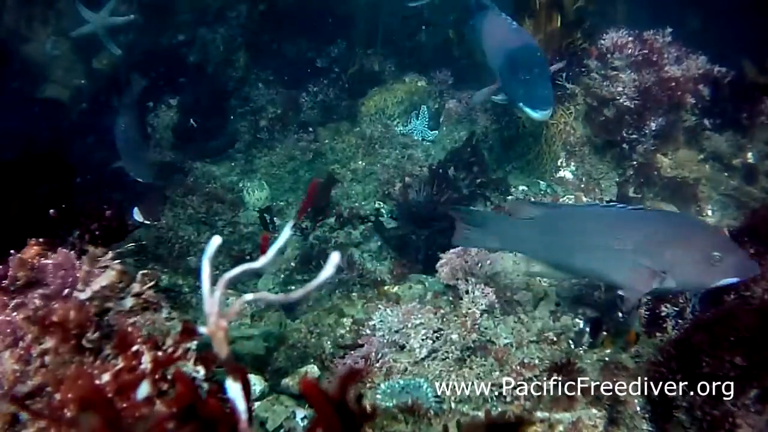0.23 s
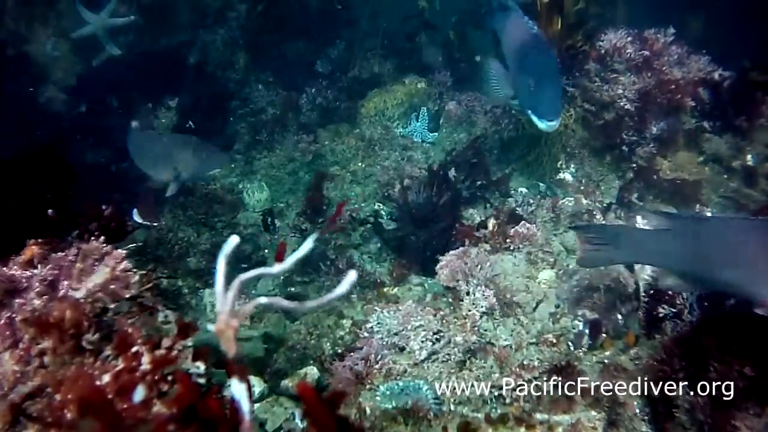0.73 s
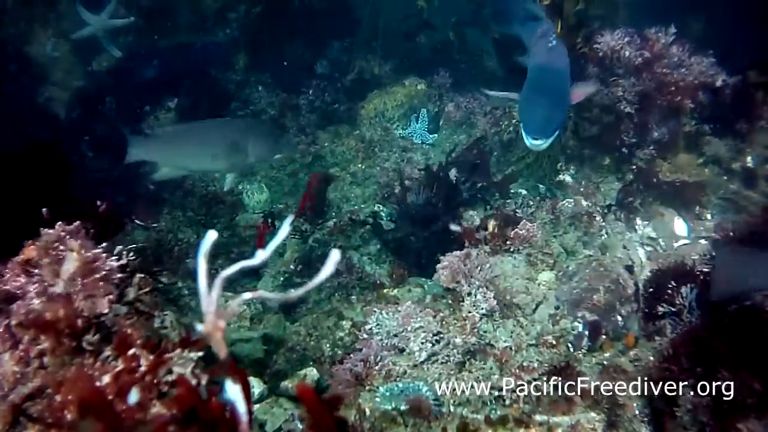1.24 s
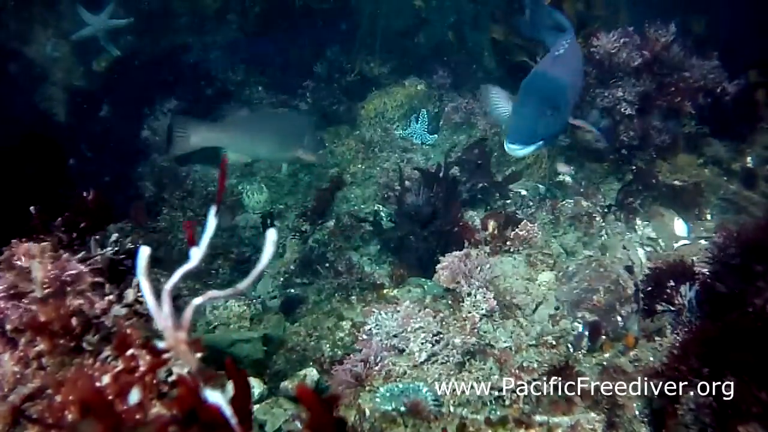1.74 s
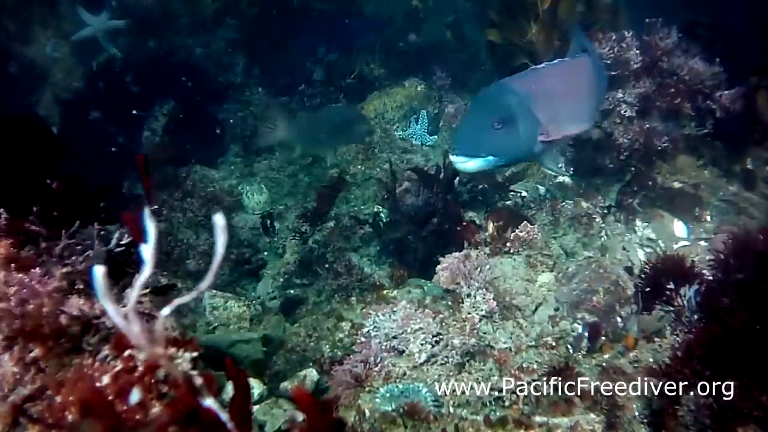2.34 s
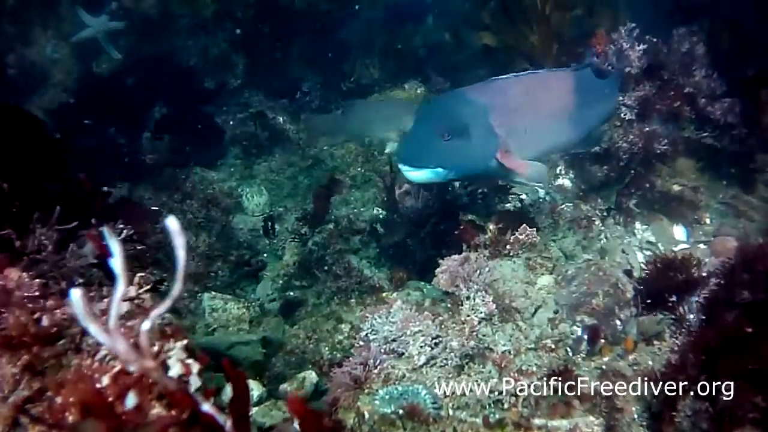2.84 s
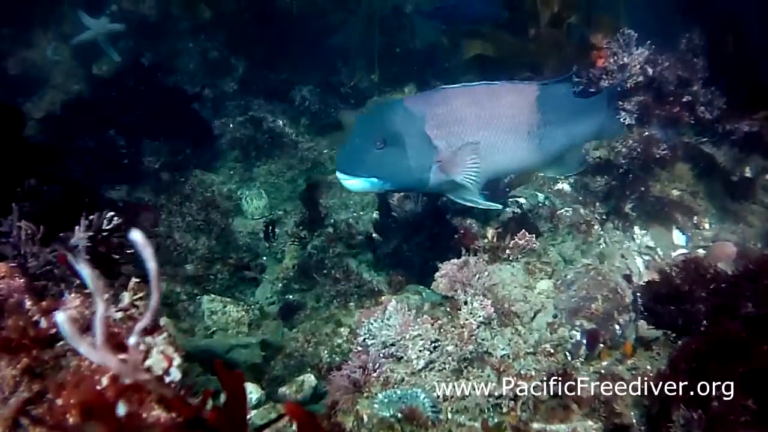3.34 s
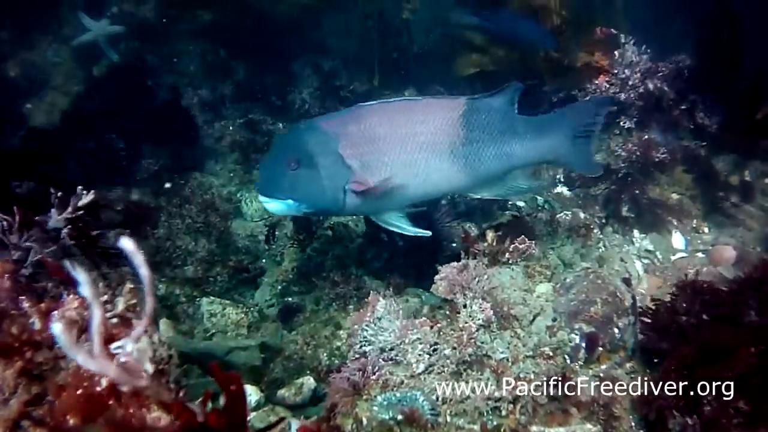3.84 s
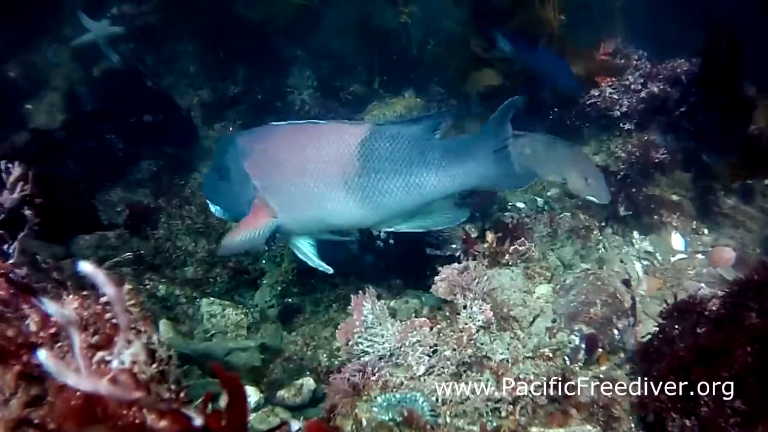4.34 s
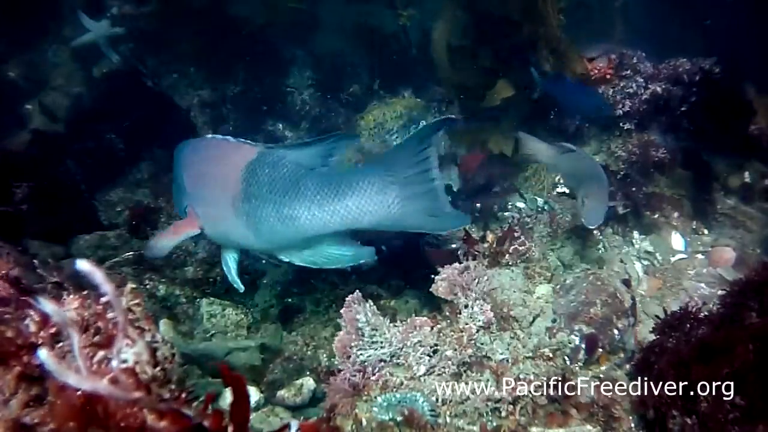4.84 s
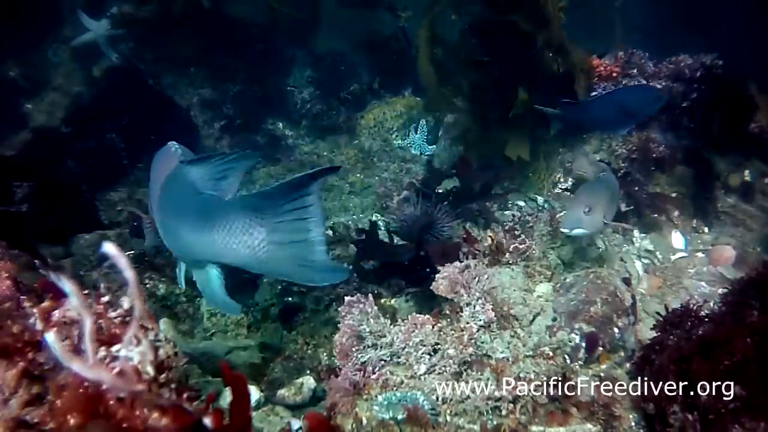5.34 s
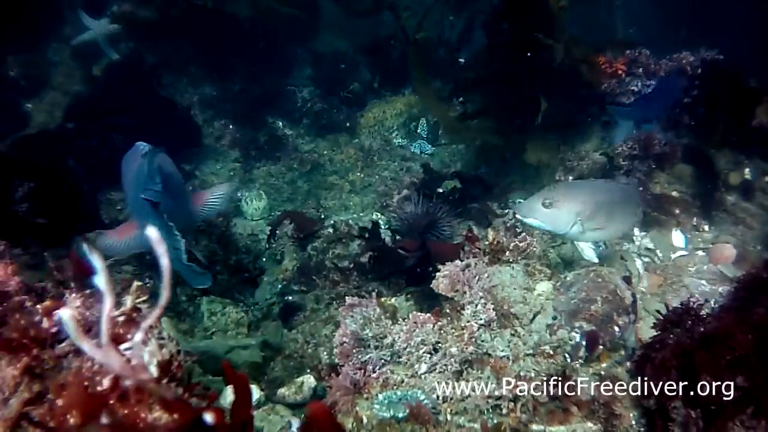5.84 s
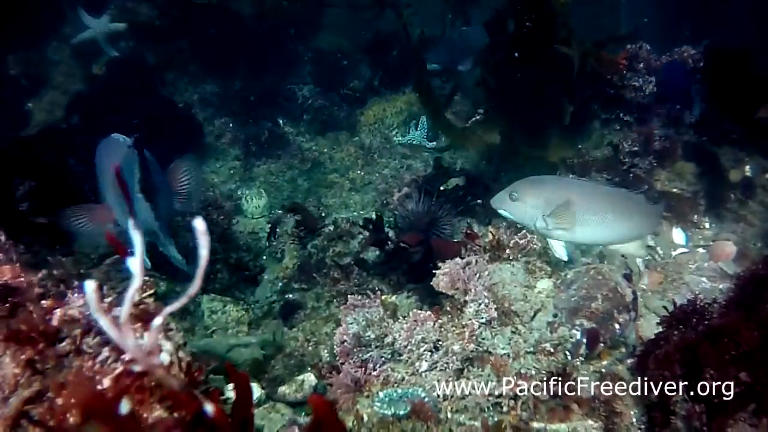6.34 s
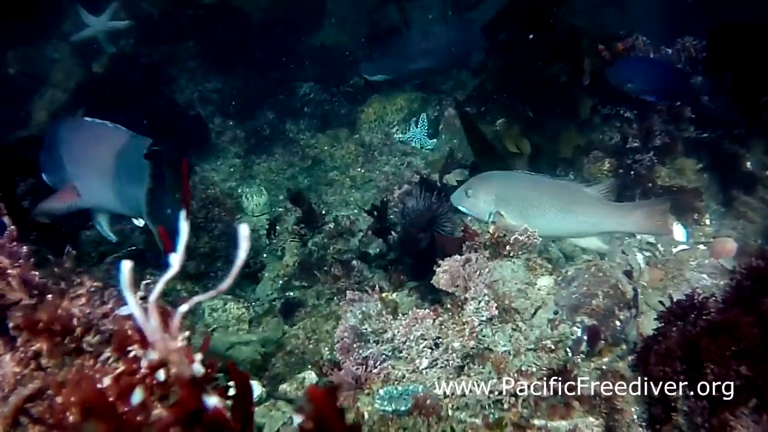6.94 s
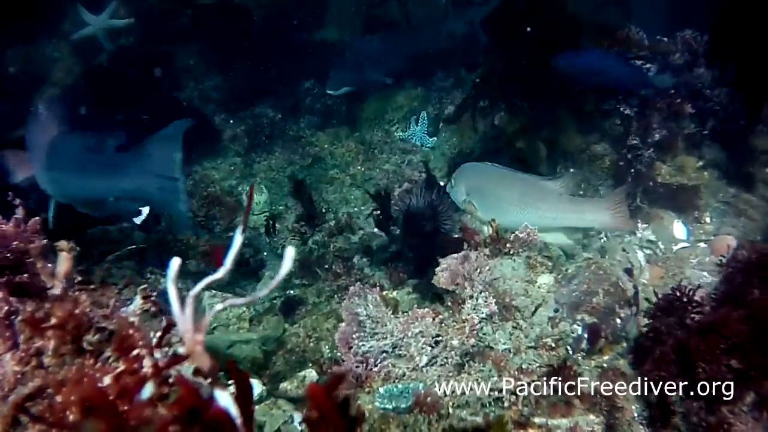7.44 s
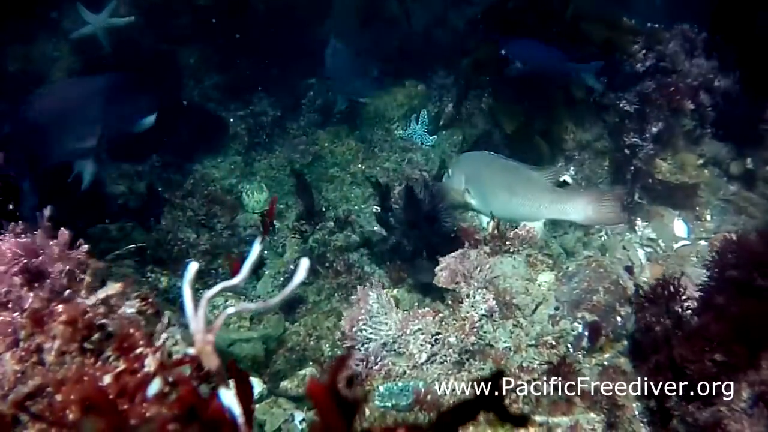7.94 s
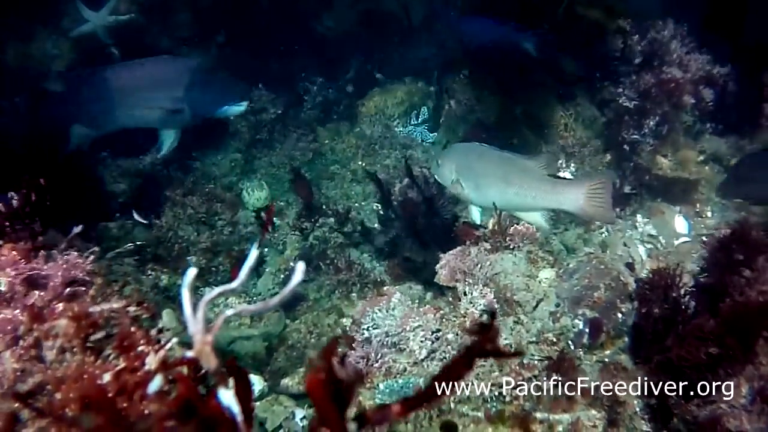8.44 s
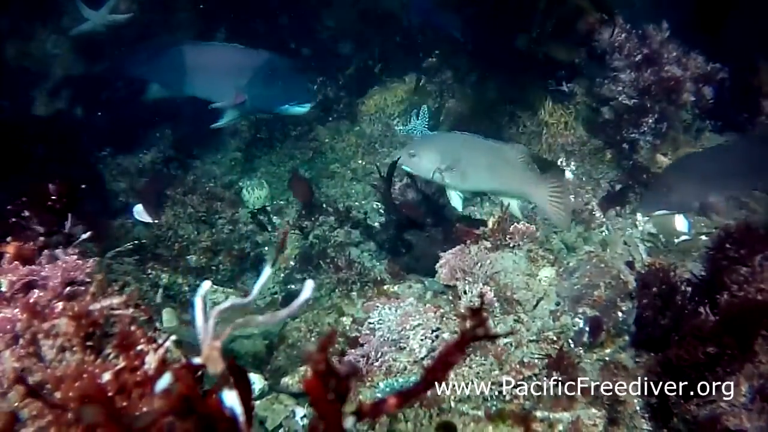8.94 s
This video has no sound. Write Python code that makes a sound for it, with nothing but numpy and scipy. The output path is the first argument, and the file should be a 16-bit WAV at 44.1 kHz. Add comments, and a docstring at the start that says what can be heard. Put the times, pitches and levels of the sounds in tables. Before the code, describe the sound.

From the start, a low underwater rumble and soft hiss lie beneath the fine sizzle of distant snapping shrimp, with a faint, thin, steady camera whine. Nearer shrimp click irregularly, several times a second, each snap sharp and slightly hollow as it scatters off the rocks and briefly rings the watertight camera case. Dull, round pops, probably fish, sound two or three times a second throughout, a little stronger around 3.4 and 5.2 seconds. Loud, close snaps stand out at about 0.7 and 2.6 seconds. The loudest cracks just after 5 seconds and momentarily overloads the microphone. Another strong click comes at 7.2 seconds, followed by two deep thumps, probably also fish, at about 7.4 and 8 seconds. A pair of hard snaps lands around 8.7 seconds, and the crackling carries on to the end at about 9 seconds.

```python
"""A camera in a watertight case hovers over a rocky reef. From the start, water rumbles and hisses, the
camera whines thinly and distant snapping shrimp sizzle. At once dull pops, probably fish, set in, and
nearer shrimp click: each collapsing bubble scatters off the rocks and rings the case. Just after five
seconds the closest snap overloads the input. Near the end come two deep thumps, probably fish too."""
import sys
import numpy as np
from scipy import signal
from scipy.fft import rfft, irfft
from scipy.io import wavfile

SR = 44100
rng = np.random.default_rng(int(sys.argv[2]) if len(sys.argv) > 2 else 0)


def generate_wav(signal):
    """Clip the signal to [-1, 1] and save it as 16-bit WAV at the path in sys.argv[1]."""
    frames = np.transpose(np.atleast_2d(signal))
    scaled = np.clip(frames, -1, 1) * 32767
    pcm = np.round(scaled).astype(np.int16)
    wavfile.write(sys.argv[1], SR, pcm)


N = 405700

# Spectrum of the water's rumble and hiss: frequency_hz, level_db
WATER_SPECTRUM = [(20, -27.5), (45, -31), (110, -34.5), (280, -38.5), (650, -49), (1400, -50),
                  (2600, -52.5), (5500, -56.5), (7500, -62), (11000, -61), (15500, -64)]
# Partials of the camera's whine: pitch_hz, width_hz, rms_db
WHINE_PARTIALS = [(4875, 140, -64.5), (5040, 550, -68), (9530, 460, -73), (14360, 410, -75)]
# Centres of a snap's bass, body, main ring and treble: frequency_hz
SNAP_CENTRES_HZ = [750, 1900, 3600, 8000]
# Normal modes of the case: pitch_hz, width_hz, gain_db
CASE_MODES = [(375,31,20.5), (507,51,21.5), (817.5,65,20), (932,144,16.5), (1732,175,11), (2300,180,7),
              (3323,362,20), (3521,361,22), (3870,485,12.5), (4340,30,6), (4656,430,5.5), (5775,207,6.5),
              (6044,720,0), (8460,1560,-6), (9620,510,-8.5)]
# Prominent pops and thumps: start_s, level_db, pitch_hz, rise_cycles
POP_EVENTS = [(0.023,-27.5,506,1.4), (0.536,-31.5,467,.8), (1.062,-31,377,1), (1.5412,-30.5,338,0.37),
              (1.662,-32,258,0.3), (1.7614,-30.5,510,1.06), (2.13,-31.5,372,1.9), (2.1848,-27.5,590,0.94),
              (2.6923,-26.5,590,0.92), (2.8576,-30,420,.6), (3.3788,-21,456,0.72), (3.717,-25.5,400,0.88),
              (3.8814,-33,394,0.52), (4.3474,-27.5,540,0.5), (4.7874,-26,358,0.68), (5.212,-21,380,0.54),
              (5.2135,-24,130,.3), (5.6251,-29,458,1.16), (5.8273,-28.5,388,0.82), (6.3391,-29,445,0.8),
              (6.7855,-27.5,494,1.55), (7.309,-25,377,0.75), (7.4,-18,114,.65), (7.4103,-23.5,262,0.51),
              (7.9715,-21,117.5,0.58), (8.4122,-23.5,257,0.43)]
# Near snaps, before the case colours them: start_s, level_db, extra_body_db, extra_treble_db
SNAP_EVENTS = [(0.041,-3.5,-0.5,-14.5), (0.1523,-15.5,-9,-8), (0.276,-17,1,-18), (0.4694,-23,-24,7),
               (0.5811,-12,-11,-8), (0.6727,-10.5,4.5,-17), (0.744,7,-10,-10), (1.1707,-21,4.5,-19),
               (1.2713,-7,6,1.5), (1.7358,-11.5,0.5,-4), (1.7918,-15,8.5,-1), (1.8399,-15,10.5,-1),
               (1.989,-12.5,0.5,6.5), (2.02,-24.5,-14,9), (2.043,-14,-1,-4), (2.4508,-25.5,2,8.5),
               (2.5896,8,-6.5,-12), (2.789,-18.5,-6,0), (2.9958,-16.5,7,-17), (3.0154,-16.5,4,-6),
               (3.2676,-13,-9,-19), (3.499,-21,10,-5), (3.5478,-5,-8,-5), (3.763,-13,4,-4),
               (4.2102,-24.5,13.5,-16), (4.3117,-20.5,-2,8), (4.7439,-17.5,18,-1), (4.8441,-16.5,-8,-7),
               (4.9019,-17,-0.5,1), (5.0262,-18,2,-4), (5.1632,16,-1,-20), (5.2278,-9.5,0.5,3.5),
               (5.5319,-15,-1,-1.5), (5.885,-18,-1.5,-4), (5.9129,-15,1.5,-11), (5.936,-14,-1.5,-16),
               (6.1282,-18,0.5,-1), (6.2422,-19.5,1,-2), (6.3578,-6.5,7,-9), (6.5644,-14.5,-1.5,-15),
               (6.995,-7,1,-12), (7.0234,-15,-13,-9), (7.228,-2,3.5,-6.5), (7.259,-16,1.5,-6),
               (7.563,-11,0,-5), (7.6371,-21.5,10,-1), (7.848,-14,16,-1.5), (8.0864,-19.5,3.5,-10),
               (8.1472,-13,-13,-16), (8.2121,-19,3,-6), (8.3151,-20.5,8.5,-11), (8.523,-17.5,0.5,3),
               (8.6444,7,-7,-11), (8.739,-2.5,10,-2), (8.9413,-13,3,-22), (9.002,-19,1,-6)]


def amp(db):
    """Amplitude grows tenfold for every 20 dB."""
    return 10 ** (np.asarray(db) / 20)


def unit_energy(x):
    """Normalisation: the squared samples sum to one."""
    return x / np.sqrt(np.sum(x ** 2) + 1e-20)


def add(track, start_s, sound):
    """Superposition: a sound adds to what is already in the track."""
    start = int(np.clip(round(start_s * SR), 0, N))
    track[start:start + len(sound)] += sound[:N - start]


def pulse(spectrum, size=512):
    """Minimum phase gives the most compact causal pulse for rows of frequency_hz, level_db."""
    hz, db = np.transpose(spectrum)
    grid_hz = np.maximum(np.arange(size // 2 + 1) * SR / size, 1)
    magnitude = amp(np.interp(np.log(grid_hz), np.log(hz), db))
    cepstrum = irfft(np.log(magnitude))
    cepstrum[1:size // 2] *= 2
    cepstrum[size // 2 + 1:] = 0
    return irfft(np.exp(rfft(cepstrum)))


def resonate(x, hz, width_hz):
    """A damped oscillator, driven by x, responds with unit gain at resonance."""
    radius = np.exp(-np.pi * width_hz / SR)
    feedforward = np.array([1, 0, -1]) * (1 - radius ** 2) / 2
    feedback = [1, -2 * radius * np.cos(2 * np.pi * hz / SR), radius ** 2]
    return signal.lfilter(feedforward, feedback, x + 1e-18)


def water(heave_db=2, heave_hz=9, rumble_hz=250):
    """Moving water makes broadband noise; slow amplitude modulation heaves the rumble under the hiss."""
    noise = signal.fftconvolve(rng.standard_normal(N), pulse(WATER_SPECTRUM, size=8192))[:N]
    rumble = signal.sosfilt(signal.butter(1, rumble_hz, fs=SR, output="sos"), noise)
    heave = signal.sosfilt(signal.butter(2, heave_hz, fs=SR, output="sos"), rng.standard_normal(N))
    heave_gain = amp(heave_db * np.sqrt(N) * unit_energy(heave))
    return noise + rumble * (heave_gain - 1)


def camera_whine():
    """Narrowband noise is heard as a wavering high tone with overtones."""
    out = np.zeros(N)
    for hz, width_hz, rms_db in WHINE_PARTIALS:
        band = resonate(rng.standard_normal(N), hz, width_hz)
        partial = resonate(band, hz, width_hz)
        out += amp(rms_db) * np.sqrt(N) * unit_energy(partial)
    return out


def snap_pulse(bass_db, body_db, treble_db):
    """A claw's cavitation bubble collapses into one pulse, its bands set relative to the main ring."""
    return pulse(list(zip(SNAP_CENTRES_HZ, [bass_db, body_db, 0, treble_db])))


def far_shrimp(per_s=500, level_db=-44.5, spread_db=4):
    """Shot noise: dense, independent snaps from across the reef merge into a fine sizzle."""
    clicks = (rng.random(N) < per_s / SR) * rng.choice([-1, 1], N)
    gains = amp(level_db + spread_db * np.minimum(rng.exponential(1, N), 3))
    return signal.fftconvolve(clicks * gains, snap_pulse(bass_db=-1, body_db=-3, treble_db=-2))[:N]


def case(x, notch_depth=0.61):
    """The wall modes ring in alternating phase, so a click swells for a millisecond before it dies."""
    rings = sum((-1) ** k * amp(gain_db) * resonate(x, hz, width_hz)
                for k, (hz, width_hz, gain_db) in enumerate(CASE_MODES))
    # Antiresonance: just under the main ring the wall hardly moves, which makes the snaps hollow.
    return rings - notch_depth * resonate(rings, hz=2690, width_hz=200)


def water_path(click, scatter_db, echo_s=0.0059, echo_db=-2, decay_s=0.0088, size=2048):
    """Multipath propagation: the direct click, then one echo within a spray of reflections off rocks."""
    t = np.arange(size) / SR
    reflections = unit_energy(rng.standard_normal(size) * np.exp(-t / decay_s))
    echo_sample = int(echo_s * rng.uniform(.95, 1.05) * SR)
    reflections[echo_sample] += amp(echo_db)
    path = amp(scatter_db) * unit_energy(reflections)
    path[0] = 1  # direct arrival
    return signal.fftconvolve(click, unit_energy(path))


def shrimp_colony(per_s=24, level_db=-27.5, spread_db=4, colour_db=8):
    """Scattering blurs the random snaps of shrimp a few metres off, each with its own spectrum."""
    out = np.zeros(N)
    for when, strength, bass, body, treble in rng.uniform(-1, 1, (int(per_s * N / SR), 5)):
        click = snap_pulse(bass_db=-2 + colour_db * bass,
                           body_db=-2 + colour_db * (bass + body) / 2,
                           treble_db=-1 + colour_db * treble)
        snap = amp(level_db + spread_db * strength) * water_path(click, scatter_db=4)
        add(out, (when + 1) / 2 * N / SR, snap)
    return out


def pop(level_db, hz, rise_s, grit_db=-9, grit_ratio=1.32, linger=2.12, size=4096):
    """A tone burst of a few cycles sounds dull and round; rough noise near its pitch outlasts it."""
    age = np.arange(size) / SR / rise_s
    envelope = (age * np.exp(1 - age)) ** 2
    tone = envelope * np.sin(2 * np.pi * (hz * rise_s * age + rng.random()))
    band = signal.butter(2, grit_ratio * hz * np.array([1 / 3, 4 / 3]), "band", fs=SR, output="sos")
    grit = np.sqrt(size / 2) * unit_energy(signal.sosfilt(band, rng.standard_normal(size)))
    grit_envelope = age / linger * np.exp(1 - age / linger)
    return amp(level_db) * (tone + amp(grit_db) * grit * grit_envelope)


def pops_and_thumps(faint_per_s=19, faint_db=-44, spread_db=3.5, faint_hz=370, gain_db=-3):
    """Loud bursts and faint random ones excite two low resonances, which hum on in free decay."""
    bursts = np.zeros(N)
    for start_s, level_db, hz, rise_cycles in POP_EVENTS:
        add(bursts, start_s, pop(level_db, hz, rise_s=rise_cycles / hz))
    for when, strength, octave in rng.uniform(-0.84, 1, (int(faint_per_s * N / SR), 3)):
        faint = pop(faint_db + spread_db * strength, faint_hz * 2 ** octave, rise_s=0.0031)
        add(bursts, (when + 1) / 2 * N / SR, faint)
    ringing = resonate(bursts, hz=382, width_hz=32) + resonate(bursts, hz=508, width_hz=30)
    return amp(gain_db) * (bursts + ringing)


def near_shrimp(close_db=2, crack_db=-4):
    """Direct sound dominates loud, bright snaps; faint, dull ones come mostly by way of the rocks."""
    out = np.zeros(N)
    for start_s, level_db, body_db, treble_db in SNAP_EVENTS:
        clearness_db = level_db + 0.23 * body_db + 0.29 * treble_db
        scatter_db = -11 - 0.54 * clearness_db  # scattered relative to direct sound
        bass_db = -5 + 0.89 * body_db + 0.58 * scatter_db  # smeared snaps keep more bass
        snap = amp(level_db) * water_path(snap_pulse(bass_db, body_db, treble_db), scatter_db)
        if level_db > close_db:  # only the closest keep a hard crack above the main ring
            snap = snap + amp(crack_db) * resonate(snap, hz=4550, width_hz=700)
        add(out, start_s, snap)
    return out


def scene():
    """The sources superpose at one microphone; every snap is transmitted through the case."""
    shrimp = case(near_shrimp() + shrimp_colony() + far_shrimp())
    return (shrimp + pops_and_thumps() + camera_whine() + water())[None]


def record(dry, cutoff_hz=15600):
    """Saturation clips the closest snap at the input; a steep low-pass then limits the bandwidth."""
    clipped = np.clip(dry, -1, 1)
    return signal.sosfilt(signal.ellip(10, .1, 80, cutoff_hz, fs=SR, output="sos"), clipped)


dry = scene()
out = record(dry)
generate_wav(out)
```